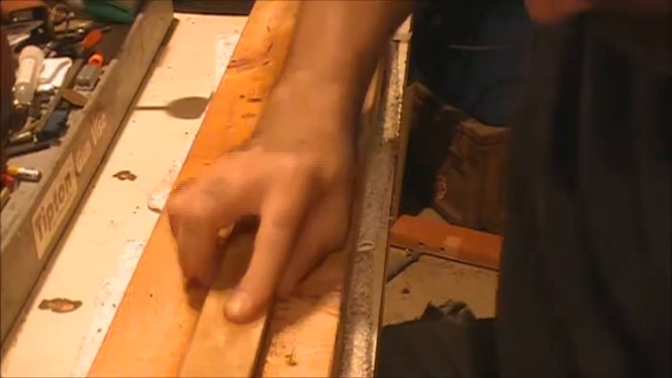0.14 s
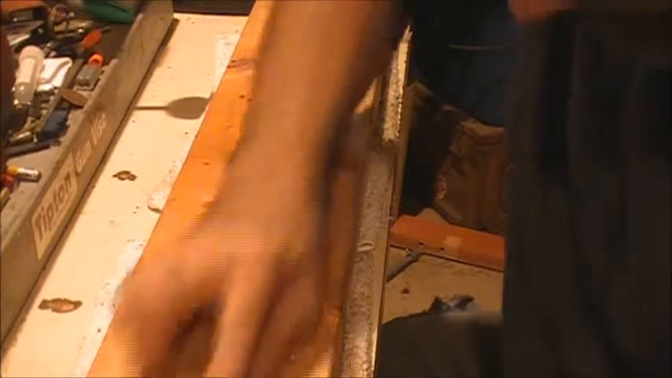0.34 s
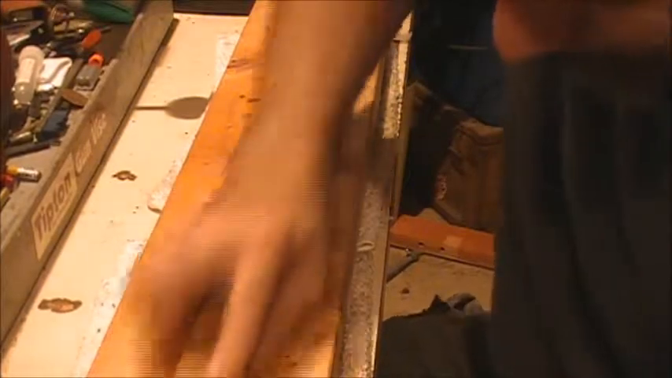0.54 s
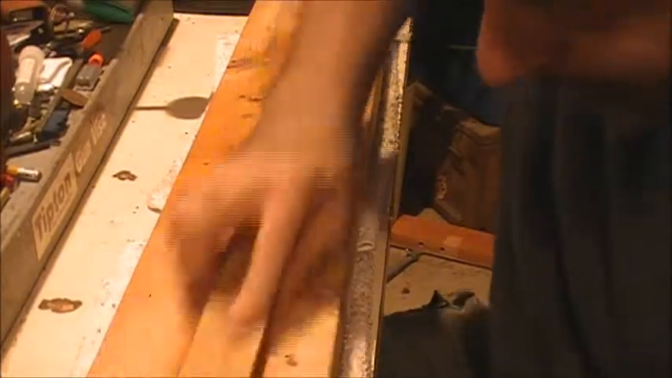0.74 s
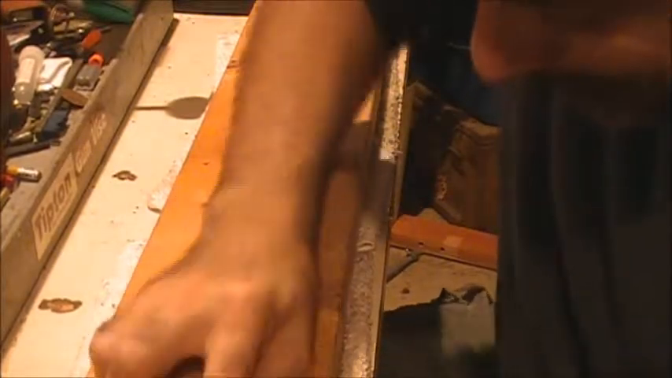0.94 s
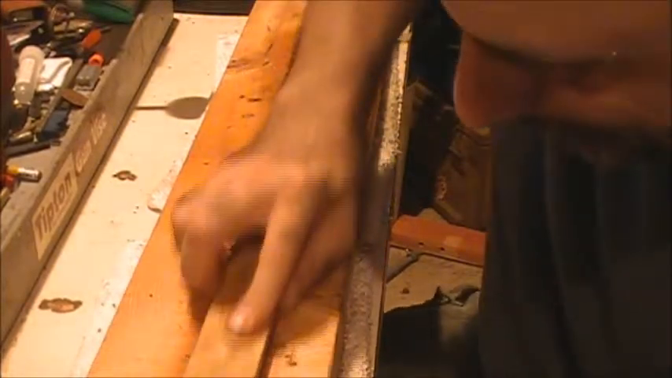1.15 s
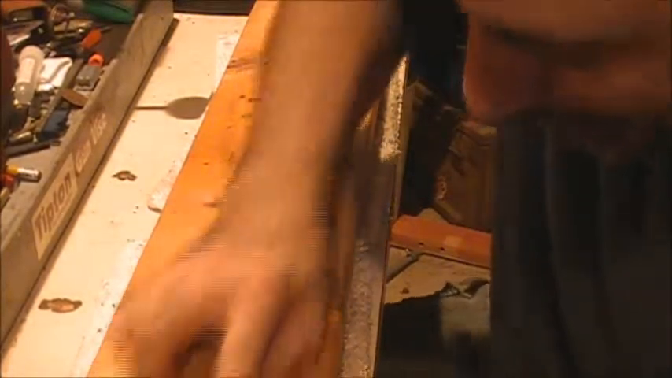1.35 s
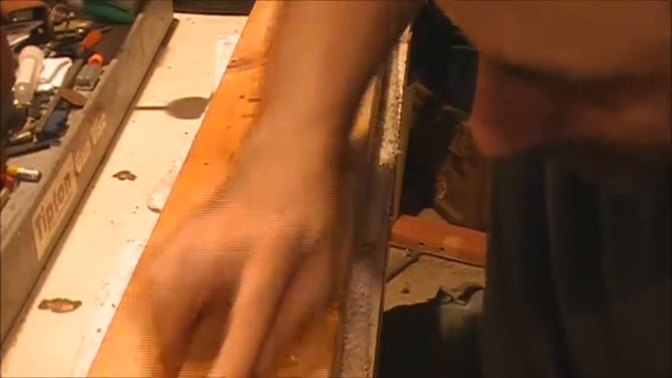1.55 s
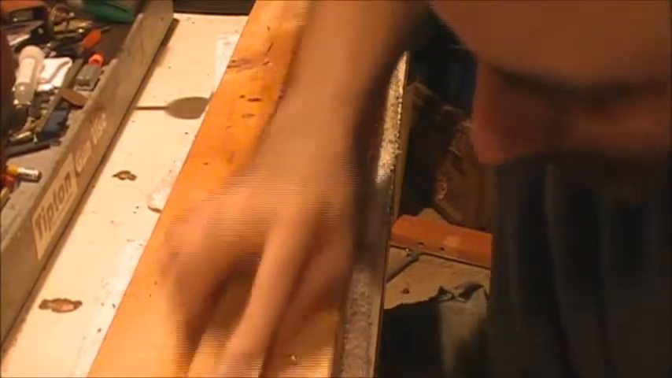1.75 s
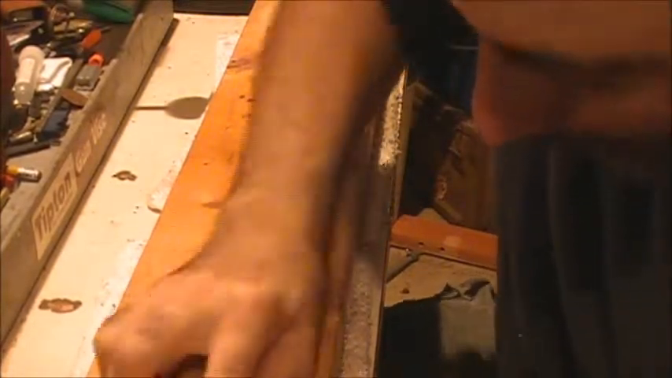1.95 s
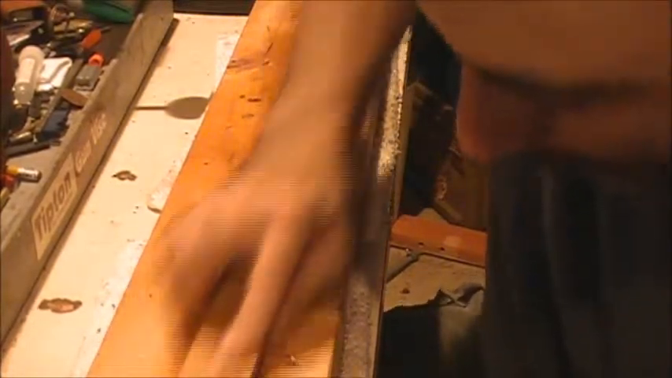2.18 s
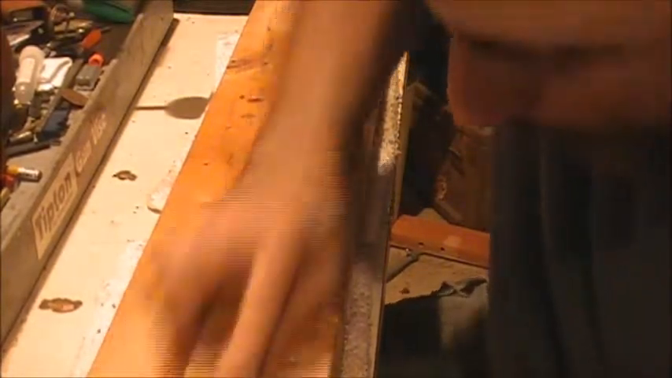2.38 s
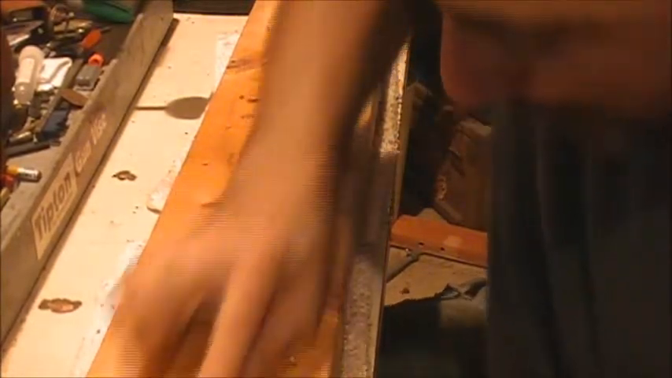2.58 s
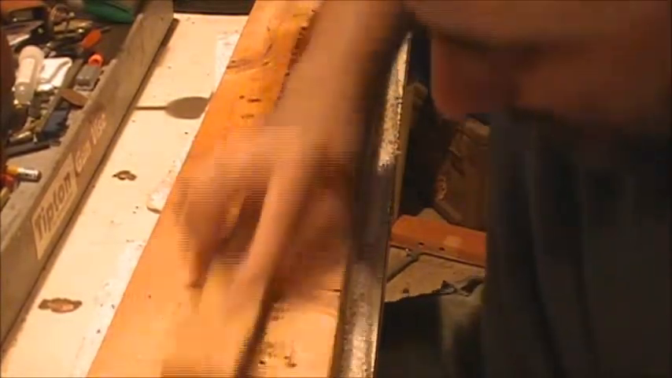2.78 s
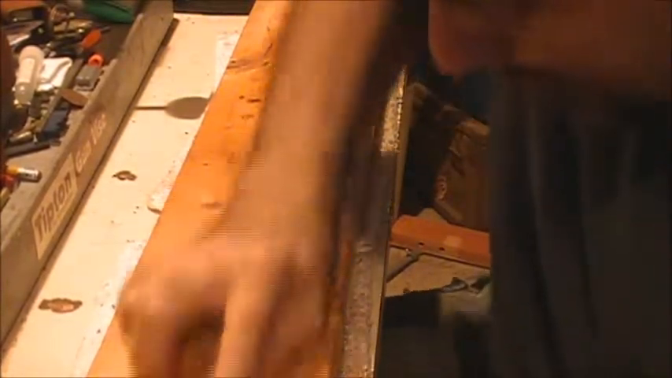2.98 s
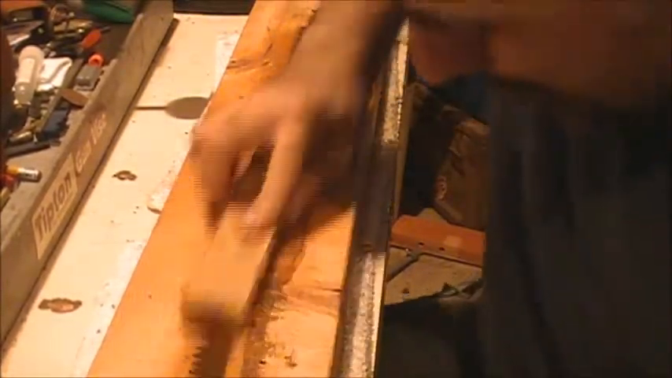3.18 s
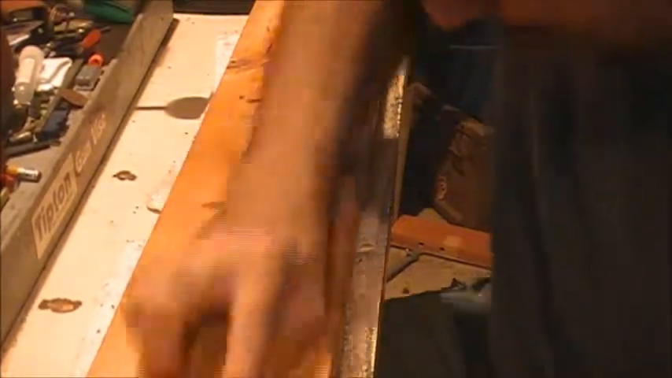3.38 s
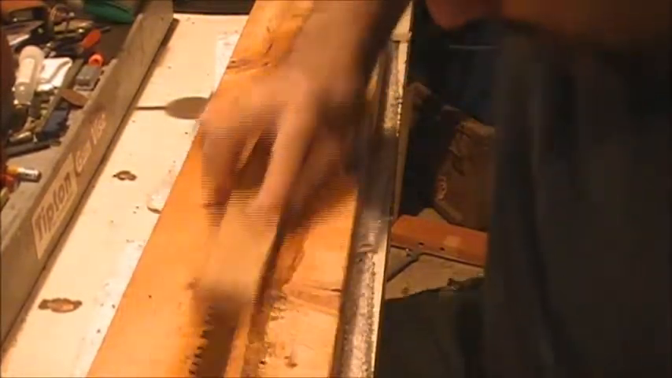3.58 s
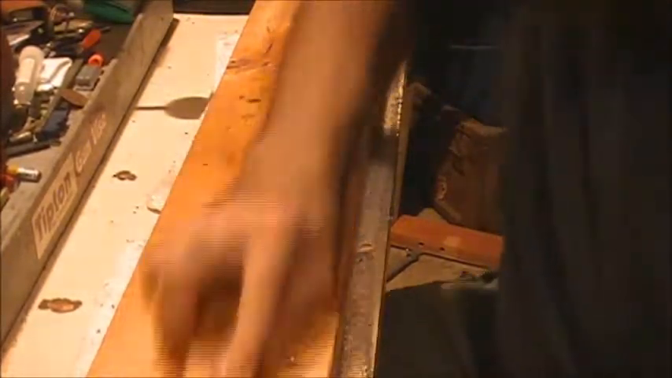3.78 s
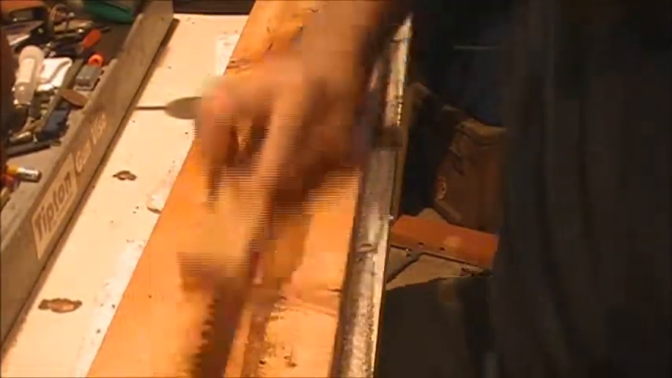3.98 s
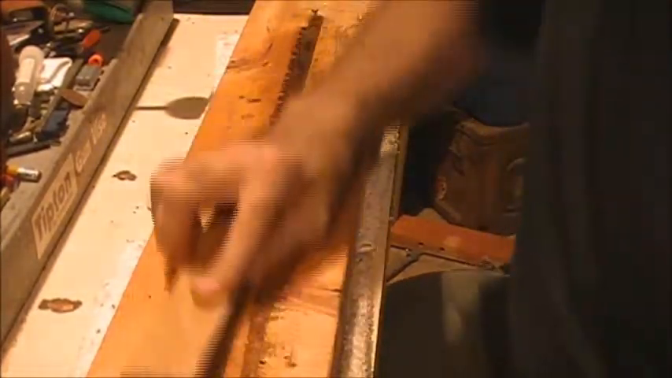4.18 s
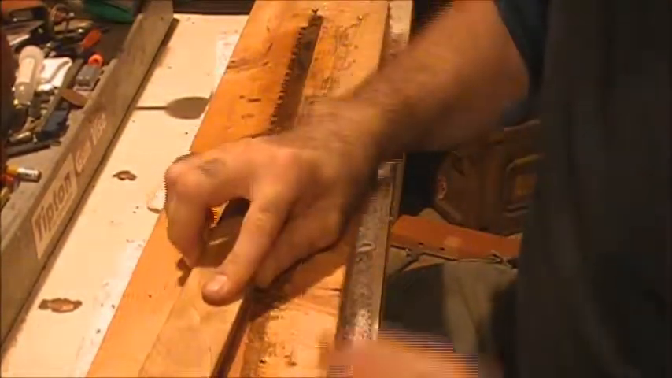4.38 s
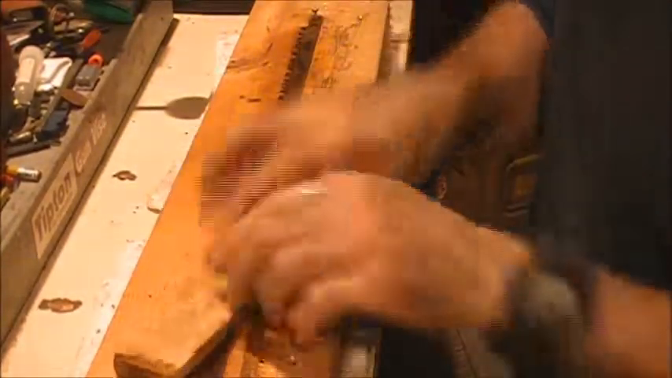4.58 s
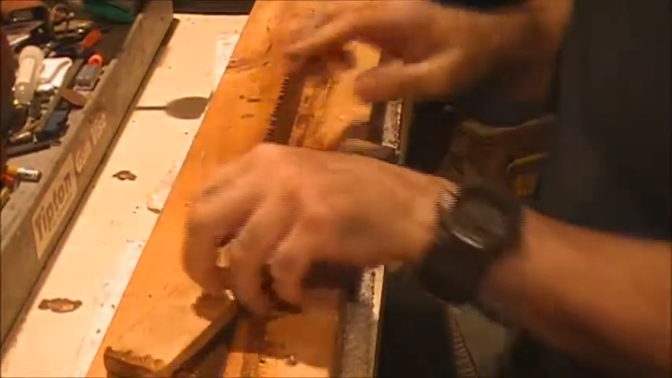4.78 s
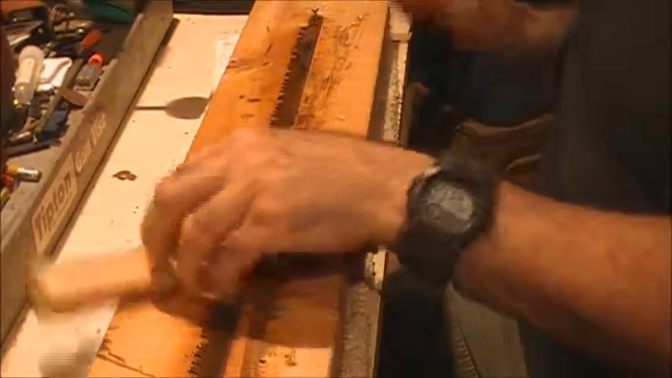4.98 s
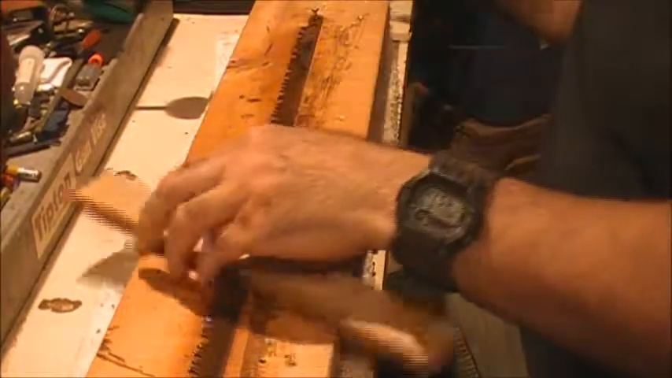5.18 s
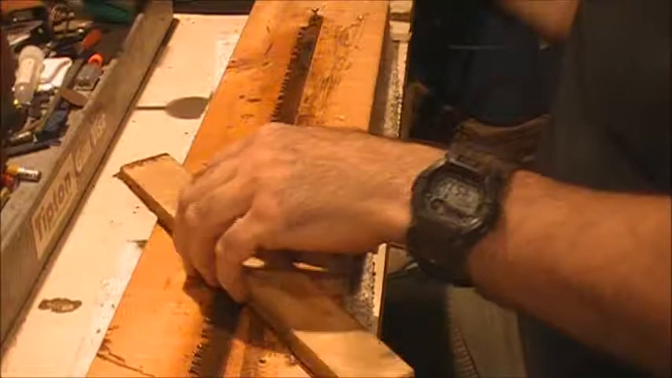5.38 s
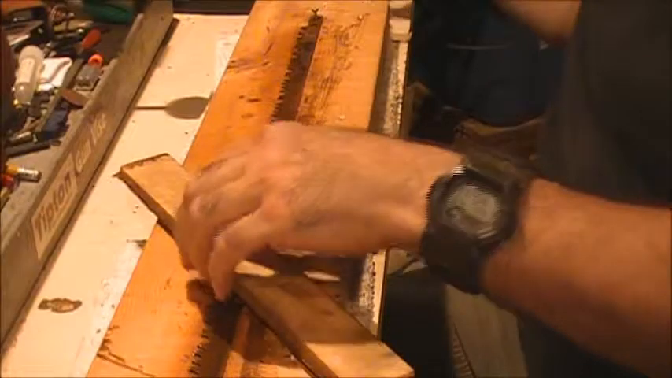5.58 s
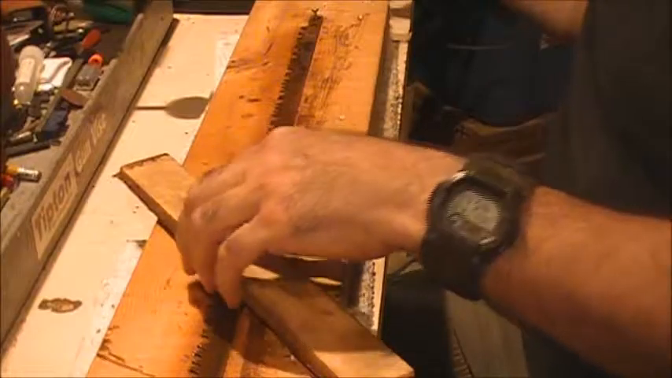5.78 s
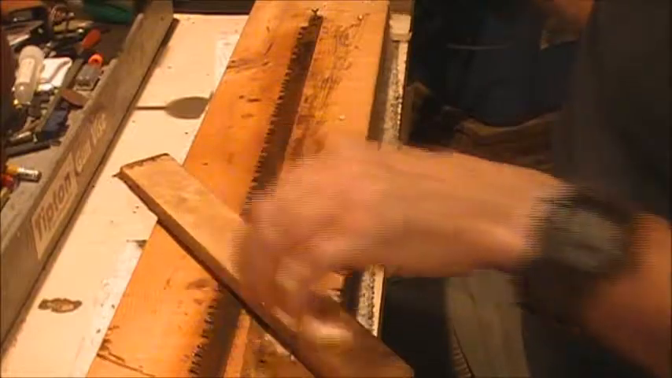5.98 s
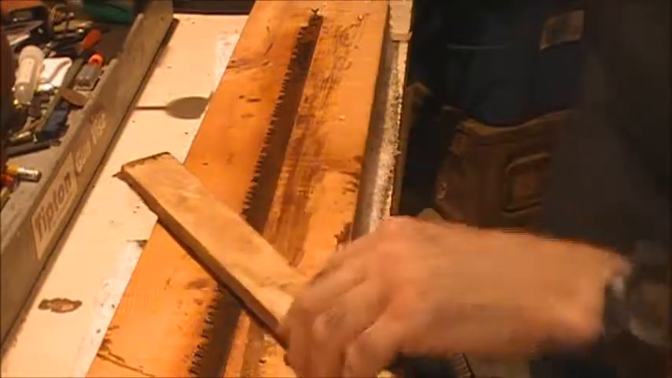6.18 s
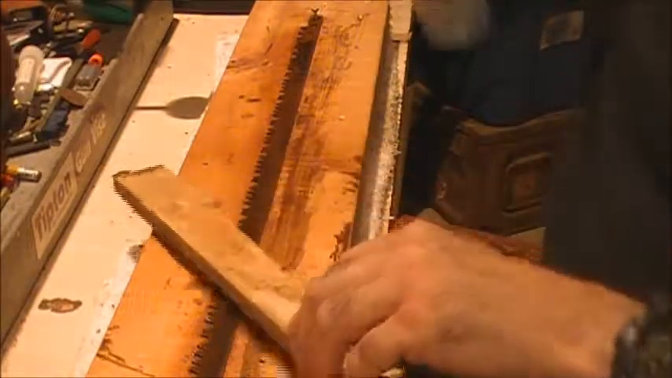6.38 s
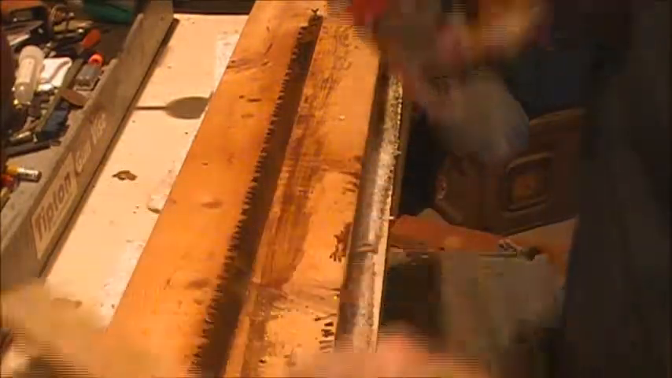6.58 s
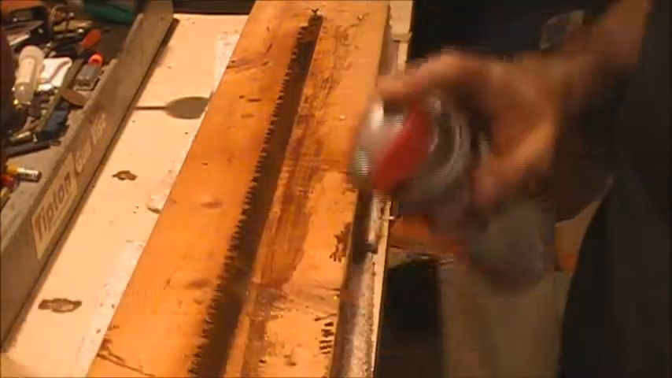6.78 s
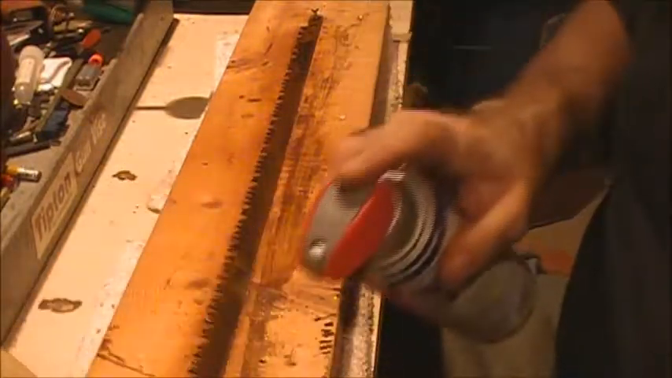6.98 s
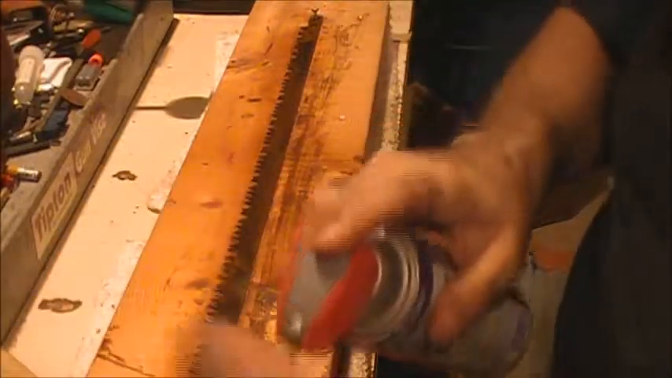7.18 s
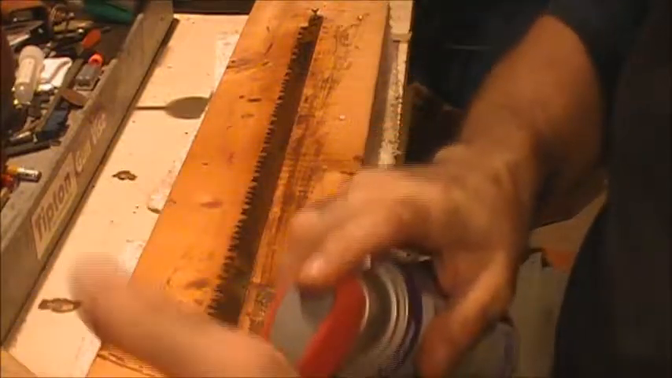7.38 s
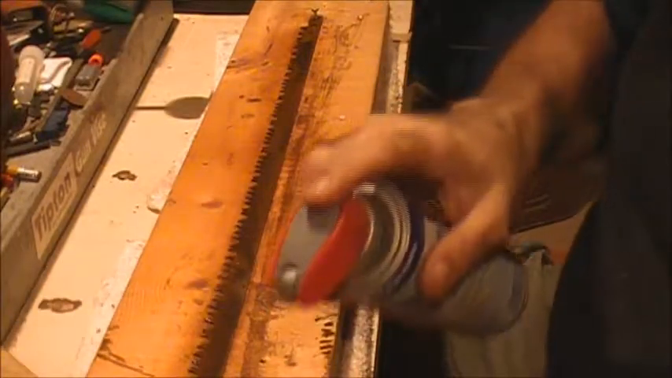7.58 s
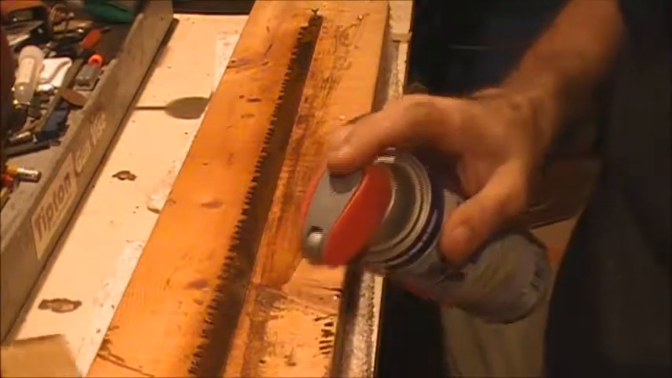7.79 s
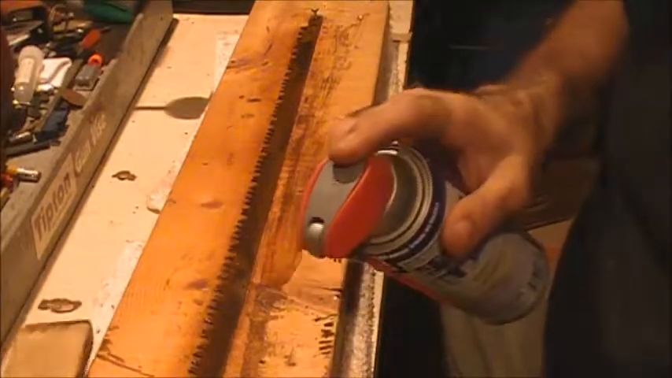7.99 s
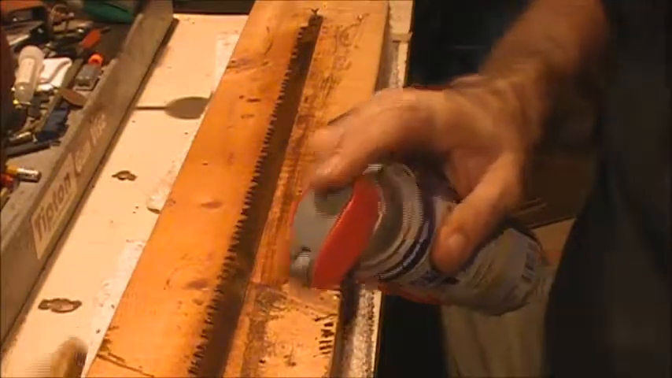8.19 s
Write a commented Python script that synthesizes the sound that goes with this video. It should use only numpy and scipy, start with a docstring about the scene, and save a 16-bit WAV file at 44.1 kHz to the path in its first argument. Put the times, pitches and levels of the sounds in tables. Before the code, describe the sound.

From 0 to about 4.4 seconds, a wooden sanding stick scrubs fast along a rusty steel blade lying on a board: alternating push and pull strokes, roughly six a second, each a dry hiss with coarse rasp, brightest mid-stroke, and a faint woody hum beneath. A woody bump lands near 2.4 as a stroke jams. Strokes grow more forceful and slow slightly after 3, ending with a weak rub and small taps at 4.5 to 4.7. From 4.9 to 5.5 the stick drags aside in a fading swish with sharp ticks. Near silence follows, with very faint knocks around 5.8. At 6.3 to 6.6 come quick scuffs, then one hard ringing wood knock at 6.66. Lighter knocks, rubs and ticks continue to 7.15, then again around 7.7, with a tiny squeak at 7.9 and a last faint scuff after 8. Close microphone, small workshop, faint steady air and hum.

```python
"""Fast gritty scrubbing is heard first: a wooden sanding stick rubs a rusty saw blade on a board, over faint shop hum.
Grit noise follows each stroke's speed as hiss, brighter at mid-stroke, and rasp, and drives the humming board.
The push and pull strokes, about six a second, slow down near the end. Then the stick is dragged aside (swept noise),
skips (short resonant bursts, ticks) and is put down with one hard knock and several lighter ones (ringing wood
modes) and a tiny squeak as a spray can is taken in hand. It is heard close up in a small workshop."""
import sys
import numpy as np
from scipy import signal
from scipy.fft import rfft, irfft, next_fast_len
from scipy.io import wavfile
from scipy.ndimage import uniform_filter1d

SR = 44100
rng = np.random.default_rng(int(sys.argv[2]) if len(sys.argv) > 2 else 0)


def put_to_file(sound):
    """Save the sound as 16-bit audio at rate SR, in the file named by the first command-line argument."""
    columns = np.atleast_2d(sound).T  # one column per channel
    safe = np.clip(columns, -1, 1)
    whole_steps = np.round(safe * 32767)
    wavfile.write(sys.argv[1], SR, whole_steps.astype(np.int16))


N = 363825
T = np.arange(N) / SR

# All levels stand ahead of the final level easing; spectra are relative shapes.
# Sanding strokes, push and pull in turn, each lasting until the next:
# (start [s], pressure [dB], rise of pressure along the stroke [dB], extra bite at the start [dB])
SANDING_STROKES = [(-0.067, -1.5, -2.5, 0.0), (0.092, -2.5, 2.5, 1.5), (0.255, 0.7, -2.5, -3.5),
                   (0.416, -2.5, 1, 4), (0.576, -0.5, 5, 2.0), (0.744, -2.1, -7.0, 1), (0.91, -0.5, -5, -6),
                   (1.089, -1.2, -2, 1), (1.248, 0.4, -3.0, -4.5), (1.423, 0.3, -4.5, 1.0),
                   (1.585, 0.9, -6.5, -5.5), (1.759, -0.5, -3, 3.5), (1.917, 1.3, 0.0, 0),
                   (2.075, -0.8, -1.5, 7.5), (2.243, 2.5, 0, -2.5), (2.418, 0.5, 1.5, 6.5),
                   (2.593, 3, 2.5, 5), (2.764, 0, 7, 17.5), (2.949, 2.5, -1.0, -2), (3.133, 1, 12.5, 8.5),
                   (3.33, 1, -5.5, 1.5), (3.538, 2.1, 1.0, -1.5), (3.746, 1.5, -5.5, -5),
                   (3.944, -0.2, 15, 10), (4.14, -0.2, 1, -1), (4.361, -15.5, -5.5, 7.5),
                   (4.488, -14, -13.5, -12.5)]
# Rasp thinning as the rust wears off, returning in the last light strokes:
# (time [s], rasp share [dB], board hum share [dB])
STROKE_TONE = [(0, -6.7, -27), (2.3, -8, -21.5), (2.8, -12.5, -28), (4.05, -12.5, -26.5), (4.2, -5, -17),
               (4.42, -12, -14.5), (4.53, -2.5, -16.5)]
# Fine hiss of grit on steel: (frequency [Hz], level [dB])
HISS_SPECTRUM = [(1000, -65), (2400, -15.5), (3800, -15.5), (4500, -7), (5100, -8), (5800, -4.5),
                 (6500, -4.5), (7650, 1), (8400, -1.5), (10000, -9.5), (12500, -17.5), (15500, -32.5)]
# Coarser rasp of stick and blade: (frequency [Hz], level [dB])
RASP_SPECTRUM = [(60, -45), (200, -30), (450, -23.5), (800, -12), (1020, -9.5), (1190, 0.5), (1290, -4),
                 (1660, 2), (2350, -5), (2750, 1.5), (3300, 1.5), (4200, -3.5), (7000, -7), (14000, -30)]
# Resonances of the board humming under the blade: (frequency [Hz], width [Hz], level [dB])
BOARD_HUM_PEAKS = [(313, 40, -9.5), (454, 67, -13), (630.7, 45, 0), (793, 54, -23)]
HISS_DB, RASP_DB, BOARD_HUM_DB = -17, -23.5, -39.5  # rms of each sanding layer
LAST_STOP_S, PAUSE_S = 4.672, .012  # end of the last stroke; rest of the hand at each turn
JAM_S, JAM_FADE_S = 2.378, .006  # one stroke hits the end of its travel and stops short
END_PRESS_DB, LIFT_DB = 1, -3.5  # bearing down towards both ends of a stroke; letting up just before the turn
BITE_SHARE, GRIP_S = 0.19, .0025  # share of the stroke over which the bite fades; time the grit takes to grip

# Workshop air: (frequency [Hz], density [dB per Hz])
AIR_SPECTRUM = [(20, -48), (55, -26), (110, -18), (190, -16), (230, -12), (290, -7), (400, -12), (540, -10),
                (800, -7), (1050, -15), (1700, -18), (3100, -25), (5500, -28), (8000, -29), (15000, -58)]
# How diffuse the air is: (frequency [Hz], side minus mid [dB])
AIR_WIDTH = [(30, -6), (60, -10), (200, -9), (380, -6), (700, -6), (1300, -1.5), (4400, -3), (15000, -1.5)]
# Hum tones of the workshop: (frequency [Hz], level [dB])
HUM_TONES = [(119, -81), (258, -65.5)]
AIR_DB = -56.5  # rms of the mid air noise

# Wood knocking, one hard knock and several lighter ones:
# (time [s], level [dB], pitch centre [Hz], spread [octaves], share of bench against board [0-1])
WOOD_KNOCKS = [(1.43, -23, 855, 0.18, .5), (2.377, -13, 680, 0.38, 0.4), (4.537, -23.5, 520, 1.2, 0),
               (4.694, -22, 1046, 1, 0.19), (5.75, -41, 520, 0.55, 0.5), (5.795, -46, 475, 0.65, 1),
               (6.66, -3.5, 1000, 0.8, 0.98), (6.701, -26.5, 746, .38, 0.8), (6.894, -23.5, 690, 0.56, .8),
               (7.121, -27, 570, 0.4, 1), (7.769, -20.5, 845, 0.8, 0.13)]
# Modes of the bench top: (frequency [Hz], level [dB], t60 [s])
BENCH_MODES = [(302, -12, 0.081), (419.5, 1, 0.095), (507, -4, 0.065), (614, -3, 0.067), (745, -2.5, 0.052),
               (870, -2, 0.062), (948, 1, 0.063), (1055, -11.5, 0.057), (1308, -3, .05), (1467, 2, 0.054),
               (1750, -2, .045), (1985, -10, 0.041), (2270, 0, 0.032), (2470, -3, .03), (2980, -2, 0.026),
               (3420, -4, .025), (3900, -7, .025), (4390, -1, .02)]
# Modes of the board under the blade: (frequency [Hz], level [dB], t60 [s])
BOARD_MODES = [(301, -4, 0.13), (390, -17, 0.071), (635, 2, .08), (804, -7, .07), (981, -4, .07),
               (1200, 3.5, 0.067), (1480, -12, .05), (1820, -14, .04)]

# Sharp ticks of grit and edges catching: (time [s], starting level [dB])
GRIT_TICKS = [(4.4426, -23), (4.4606, -26), (4.6869, -19), (4.9164, -23), (5.1783, -22.5), (5.3667, -25.5),
              (5.72, -38), (6.3219, -39), (6.3663, -40), (6.4285, -29), (6.9143, -37), (7.022, -23.5),
              (7.545, -51), (7.753, -31), (7.7673, -30), (8.082, -38)]
# Colour of the ticks: (frequency [Hz], level [dB])
TICK_SPECTRUM = [(100, -35), (500, -29), (1600, -15), (4000, -1), (8000, 2), (10500, -5), (15000, -23)]

# The stick dragged aside across the board in one move: (time [s], level [dB], woody share [dB])
STICK_DRAG = [(4.909, -62, -13), (4.914, -35, -13), (4.955, -26, -10.5), (5.05, -37, -5.5),
              (5.1, -29.5, -14), (5.13, -39, -11), (5.29, -36.5, -9.5), (5.42, -41.5, -14), (5.54, -73, -1)]
# Short rubs of stick, fingers and can: (start [s], length [s], level [dB], woody share [dB])
HAND_RUBS = [(4.672, 0.027, -31.5, -10), (4.707, 0.092, -33.5, -9.5), (4.78, .11, -61, -3),
             (6.147, 0.12, -58, -7), (6.256, 0.086, -51.5, -11), (6.328, 0.44, -53, 1),
             (6.412, .065, -39.5, -9.5), (6.684, 0.15, -45, 1), (6.73, 0.044, -33, -18),
             (6.827, 0.043, -39, 4.5), (6.863, 0.12, -47, 4.5), (6.941, 0.17, -33, -4),
             (7.109, 0.045, -41.5, -2.5), (7.137, 0.058, -50.5, -4), (7.698, 0.096, -39.5, -9.5),
             (7.781, 0.25, -53, -6), (8.07, .02, -46, -5), (8.087, 0.13, -58.5, -1), (8.151, 0.021, -47, 3)]
# Dry swish of sliding wood: (frequency [Hz], level [dB])
SWISH_SPECTRUM = [(100, -57), (1500, -23), (2400, -11.5), (3000, -2.5), (4200, -3.5), (5300, 3), (6500, 1),
                  (7800, 5), (10000, -7), (15000, -21)]
# Woody body of the slide: (frequency [Hz], level [dB])
WOODY_SPECTRUM = [(40, -47.5), (150, -20), (400, -8), (630, 1.5), (1000, -4.5), (1450, 3.5), (1750, 3),
                  (2400, -2.5), (4000, -4.5), (9000, -46)]
DRAG_JUDDER_DB, DRAG_JUDDER_RATE = 0.4, 49  # spread of the random catching; new values a second
RUB_PEAK, RUB_CURVE = 0.42, 0.68  # where in a rub the hand is fastest [0-1]; how steeply loudness follows speed
RUB_RELEASE_S = 0.0048  # time constant of the power as the contact eases off

# Stick and fingers skipping and scuffing, levels before the colour:
# (time [s], length [s], level [dB], ringing near [Hz])
SKIP_SCUFFS = [(4.994, 0.028, -33, 3100), (5.077, 0.024, -35, 3420), (5.107, 0.01, -22, 4870),
               (5.279, 0.019, -36.5, 3180), (6.445, 0.012, -35, 4500), (6.457, 0.0072, -31, 5470),
               (6.545, 0.011, -43, 3300), (6.563, .007, -45, 3400), (6.583, 0.011, -36, 4200),
               (6.603, 0.014, -28.5, 3600), (6.624, 0.017, -30, 3700), (6.657, 0.0071, -24, 3700),
               (6.707, 0.024, -34, 4100), (6.768, 0.057, -40.5, 3900), (6.938, 0.011, -34.5, 5200),
               (7.075, 0.019, -39, 5400), (7.714, 0.0067, -36.5, 4600), (7.731, 0.015, -39, 4470),
               (7.828, 0.027, -48, 4300), (7.865, .013, -46, 3100), (8.154, 0.018, -42.5, 3200)]
# Colour of the scuffs: (frequency [Hz], level [dB])
SCUFF_SPECTRUM = [(100, -26), (2200, -10), (2900, 1), (5000, -2), (8200, 2), (10000, 2.5), (15000, -18)]

# Short squeaks as the grip shifts: (time [s], pitch [Hz], level [dB])
GRIP_SQUEAKS = [(7.923, 1860, -40)]

# How far left and right differ: (frequency [Hz], side minus mid [dB])
STEREO_WIDTH = [(250, -27.5), (700, -31), (1500, -60), (3600, -60.5), (4500, -10), (5600, -19),
                (7800, -15.5), (8700, -7.5), (9400, -4), (12500, -7.5), (13500, -11)]
TOP_HZ = 15600  # top of the audible band


def undb(db):
    """Decibels to gain."""
    return 10 ** (np.asarray(db) / 20)


def unit(x):
    """Scale to rms 1."""
    return x / np.sqrt(np.mean(x ** 2))


def gains(points, size):
    """Gain at each Fourier bin from (Hz, dB) points, joined along log frequency."""
    hz, db = np.transpose(points)
    bins = np.maximum(np.arange(size // 2 + 1) * SR / size, 1)
    return undb(np.interp(np.log(bins), np.log(hz), db))


def shape(x, points):
    """Filter x by a spectrum of (Hz, dB) points."""
    size = next_fast_len(N + SR // 20)
    return irfft(rfft(x, size) * gains(points, size), size)[:N]


def colour(x, points):
    """Filter x by a spectrum, then scale to rms 1."""
    return unit(shape(x, points))


def resonate(x, hz, width_hz):
    """One resonance, gain 1 at its centre."""
    return signal.lfilter(*signal.iirpeak(hz, hz / width_hz, fs=SR), x)


def walk(rate):
    """Smooth random wander of rms 1, taking about `rate` new values a second."""
    hold = max(int(SR / rate), 2)
    steps = np.repeat(rng.standard_normal(N // hold + 1), hold)
    return unit(uniform_filter1d(steps, hold)[:N])


def add(track, s, sound):
    """Mix a sound in at time s."""
    i = int(s * SR)
    track[i:i + len(sound)] += sound[:N - i]


def grit(rate, scatter_db):
    """Tiny fractures of uneven size, `rate` a second, at constant mean power."""
    chance = np.clip(rate / SR, 1e-4, 1)
    hits = rng.random(N) < chance
    sizes = rng.standard_normal(N) * undb(scatter_db * rng.standard_normal(N))
    return unit(hits * sizes / np.sqrt(chance))


def wander(x, flutter_db, order=9):
    """Neighbouring bands of the noise swell and fade independently at random."""
    centres = np.geomspace(1200, 10000, order)
    return x + sum((undb(flutter_db * walk(28)) - 1) * resonate(x, hz, hz / 6) for hz in centres)


def stroke_motion(jerk=.1, jerk_share=.065):
    """Hand speed, place along the blade and pressure gain through every back-and-forth stroke."""
    speed, reach, press = np.zeros((3, N))
    ends = [row[0] - PAUSE_S for row in SANDING_STROKES[1:]] + [LAST_STOP_S]
    for k, ((start, pressure_db, rise_db, bite_db), end) in enumerate(zip(SANDING_STROKES, ends)):
        on = slice(*np.searchsorted(T, [start, end]))
        place = (T[on] - start) / (end - start)
        # the grit breaks free with a jerk
        speed[on] = np.abs(np.sin(np.pi * place)) + jerk * np.exp(-place / jerk_share)
        speed[on] *= 1 - np.exp(-(T[on] - start) / GRIP_S)
        if start < JAM_S < end:
            speed[on] *= np.exp(-np.maximum(T[on] - JAM_S, 0) / JAM_FADE_S)
        reach[on] = (-1) ** k * np.cos(np.pi * place)  # -1 at one end of the travel, +1 at the other
        effort_db = pressure_db + rise_db * (place - .5) + bite_db * np.exp(-place / BITE_SHARE)
        press[on] = undb(effort_db + END_PRESS_DB * reach[on] ** 2 + LIFT_DB * place ** 8)
    return speed, reach, press


def sanding(lean_db=0.87, patch_db=0.63, hiss_flutter_db=1.0):
    """Stroke speed sets how many grains catch and how bright they sound; the grains also drive the board."""
    speed, reach, press = stroke_motion()
    s, rasp_db, hum_db = np.transpose(STROKE_TONE)
    rasp_share = undb(np.interp(T, s, rasp_db))
    hum_share = undb(np.interp(T, s, hum_db))
    press = press * undb(patch_db * walk(80))  # patches of rust pass under the grit
    grains = grit(8000 + 34000 * speed, scatter_db=1.45) * press
    lean = undb(lean_db * reach)  # one end of the blade rasps more, the other drives the board harder

    hiss = colour(wander(grains, flutter_db=hiss_flutter_db) * speed ** 1.03, HISS_SPECTRUM)

    rasp_level = speed ** 0.62 * rasp_share / lean * undb(0.74 * walk(35))
    rasp = colour(wander(grains, flutter_db=3.0) * rasp_level, RASP_SPECTRUM)

    drive_level = speed ** 0.17 * hum_share * lean * undb(2.43 * walk(21.95))
    drive = colour(grains * drive_level, [(30, -25.5), (250, -13.0), (1000, 4), (3000, -19)])
    hum = unit(sum(undb(db) * resonate(drive, hz, width) for hz, width, db in BOARD_HUM_PEAKS))
    return undb(HISS_DB) * hiss + undb(RASP_DB) * rasp + undb(BOARD_HUM_DB) * hum


def workshop():
    """Diffuse air noise, nearly steady, with hum tones wavering in level and phase."""
    mid, side = (colour(rng.standard_normal(N), AIR_SPECTRUM) for _ in range(2))
    side = shape(side, AIR_WIDTH)
    air = (mid + np.array([side, -side])) * undb(AIR_DB + .5 * walk(3.1))
    hum = np.zeros(N)
    for hz, db in HUM_TONES:
        tone = unit(np.sin(2 * np.pi * hz * T + 0.72 * walk(17)))
        hum += undb(db + 2 * walk(4.8)) * tone
    return air + hum


def ring(modes, centre_hz, spread, t):
    """Decaying modes of a struck plank; the contact favours those near centre_hz."""
    hz, mode_db, t60 = np.transpose(modes)[:, :, None]
    weight = undb(mode_db) * np.exp(-.5 * (np.log2(hz / centre_hz) / spread) ** 2)
    phase = rng.normal(0, 1.0, hz.shape)
    waves = np.sin(2 * np.pi * hz * t + phase) * np.exp(-np.log(1000) * t / t60)
    return np.sum(weight * waves, axis=0) / np.sqrt(np.sum(weight ** 2))


def knocks(crack_s=0.01, crack_db=-6):
    """Each blow rings the board and the bench; the cluttered bench adds a short crack."""
    out, t = np.zeros(N), T[:SR // 4]
    for s, db, centre_hz, spread, share in WOOD_KNOCKS:
        share = np.clip(share, 0, 1)
        crack = resonate(rng.standard_normal(len(t)), centre_hz, 1400 * spread)
        crack = unit(resonate(crack, centre_hz, 2200 * spread))
        bench = ring(BENCH_MODES, centre_hz, spread, t) + undb(crack_db) * crack * np.exp(-t / crack_s)
        board = ring(BOARD_MODES, centre_hz, spread, t)
        blow = np.sqrt(share) * bench + np.sqrt(1 - share) * board
        contact = 1 - np.exp(-t / .0004)  # soft onset
        add(out, s, undb(db) * blow * contact)
    # narrow planks radiate little bass
    return signal.sosfilt(signal.butter(5, 270, "high", fs=SR, output="sos"), out)


def ticks(decay_s=0.002):
    """Single grains and edges snap free: coloured noise under sudden, fast-fading gains."""
    gain = np.zeros(N)
    for s, db in GRIT_TICKS:
        add(gain, s, undb(db) * np.exp(-T[:SR // 20] / decay_s))
    return gain * colour(rng.standard_normal(N), TICK_SPECTRUM)


def sliding(flutter_db=2.5):
    """One long drag over dusty wood, and short rubs that speed up and slow to a stop; all catch unevenly."""
    s, db, woody_db = np.transpose(STICK_DRAG)
    drag = undb(np.interp(T, s, db) + DRAG_JUDDER_DB * walk(DRAG_JUDDER_RATE))
    drag = drag * (T > s[0]) * (T < s[-1])
    swish_power = drag ** 2
    woody_power = (drag * undb(np.interp(T, s, woody_db))) ** 2

    release = np.exp(-T[:SR // 20] / RUB_RELEASE_S)
    for start, length, db, woody_db in HAND_RUBS:
        elapsed = np.linspace(0, 1, int(length * SR))
        place = np.interp(elapsed, [0, np.clip(RUB_PEAK, 0, 1), 1], [0, .5, 1])  # .5 where fastest
        rub = undb(db) * np.abs(np.sin(np.pi * place)) ** RUB_CURVE
        power = np.abs(signal.fftconvolve(rub ** 2, release / release.sum()))
        add(swish_power, start, power)
        add(woody_power, start, power * undb(woody_db) ** 2)

    grains = wander(grit(9000, scatter_db=2.5) * undb(1.5 * walk(130)), flutter_db=flutter_db)
    swish = np.sqrt(swish_power) * colour(grains, SWISH_SPECTRUM)
    woody = np.sqrt(woody_power) * colour(grains, WOODY_SPECTRUM)
    return swish + woody


def scuffs(width_share=0.25):
    """Brief bursts of friction, each exciting a resonance of the stick."""
    out = np.zeros(N)
    for s, length, db, hz in SKIP_SCUFFS:
        friction = unit(resonate(rng.standard_normal(SR // 8), hz, hz * width_share))
        contact = signal.windows.tukey(int(length * SR), .5)
        add(out, s, undb(db) * contact * friction[:len(contact)])
    return shape(out, SCUFF_SPECTRUM)


def squeaks(decay_s=.01):
    """A finger sticks and slips for an instant: a short sine with wavering phase."""
    out, t = np.zeros(N), T[:SR // 10]
    waver = 0.74 * walk(320)[:len(t)]
    for s, hz, db in GRIP_SQUEAKS:
        envelope = (1 - np.exp(-t / .001)) * np.exp(-t / decay_s)
        add(out, s, undb(db) * envelope * np.sin(2 * np.pi * hz * t + waver))
    return out


def widen(x):
    """A randomly wandering phase makes left and right differ, mostly in the treble."""
    drift = 3 * walk(120)  # phase in radians
    side = shape(np.real(signal.hilbert(x) * np.exp(1j * drift)), STEREO_WIDTH)
    return np.array([x + side, x - side])


def room(x, t60_s=0.64, wet_db=-19):
    """Short, dull reflections from the bench and cluttered walls, different on each side."""
    t = T[:SR // 2]
    tails = rng.standard_normal((2, len(t))) * np.exp(-np.log(1000) * t / t60_s) * (t > .004)
    tails = tails / np.sqrt(np.sum(tails ** 2, axis=1, keepdims=True))
    wall_gain = gains([(200, 0), (700, 1.0), (1800, 1.0), (14000, -4.5)], len(t))
    tails = irfft(rfft(tails) * wall_gain, len(t))
    return undb(wet_db) * signal.fftconvolve(x[None], tails, axes=1)[:, :N]


def scene():
    """Sanding, then putting the stick away, in the workshop."""
    bench = sanding() + knocks() + ticks() + sliding() + scuffs() + squeaks()
    return widen(bench) + room(bench) + workshop()


def record(dry, knee_db=-24, follow_s=0.055):
    """The overall level eases down while the sound stays loud, and the top is cut."""
    power, pole = np.mean(dry ** 2, axis=0), np.exp(-1 / (follow_s * SR))
    recent, _ = signal.lfilter([1 - pole], [1, -pole], power, zi=[np.mean(power[:SR])])
    gain = (1 + recent / undb(knee_db) ** 2) ** (-1 / 3)
    return signal.sosfilt(signal.ellip(8, .2, 70, TOP_HZ, fs=SR, output="sos"), dry * gain)


dry = scene()
out = record(dry)
put_to_file(out)
```